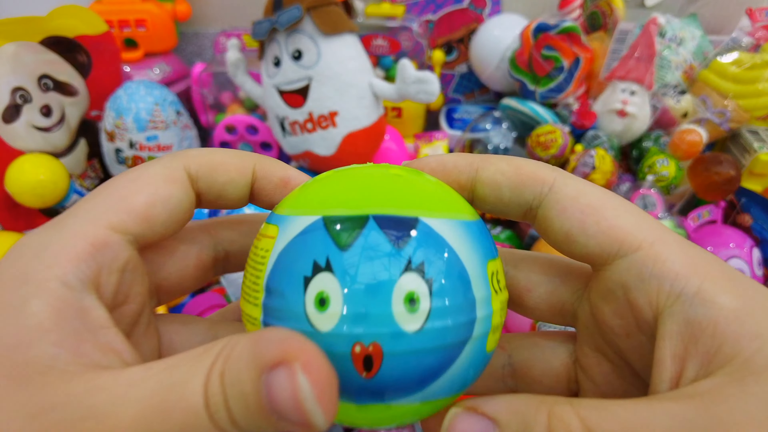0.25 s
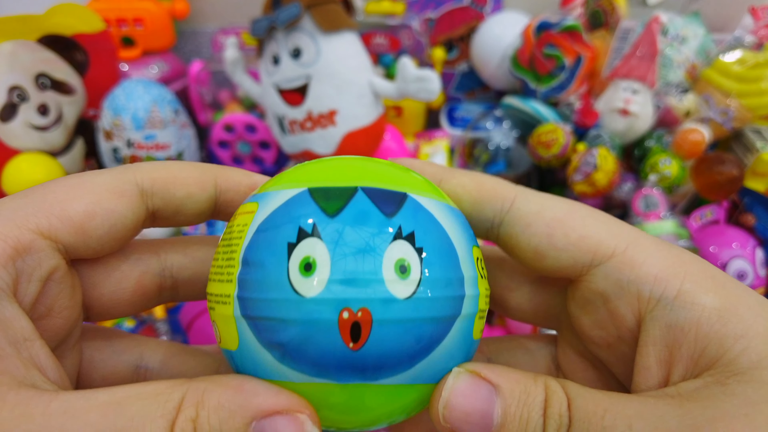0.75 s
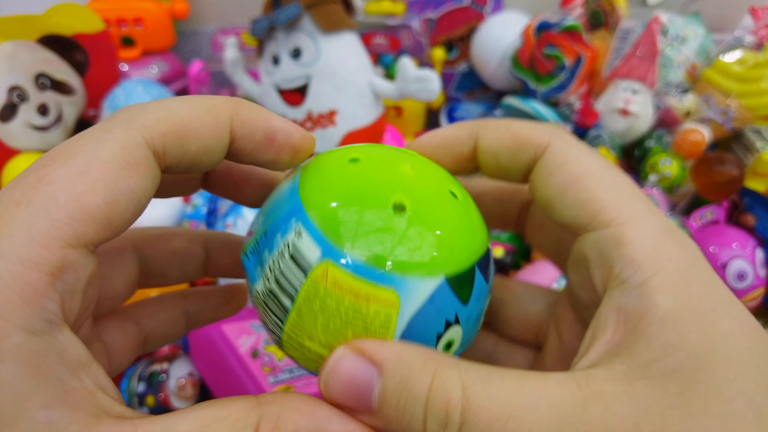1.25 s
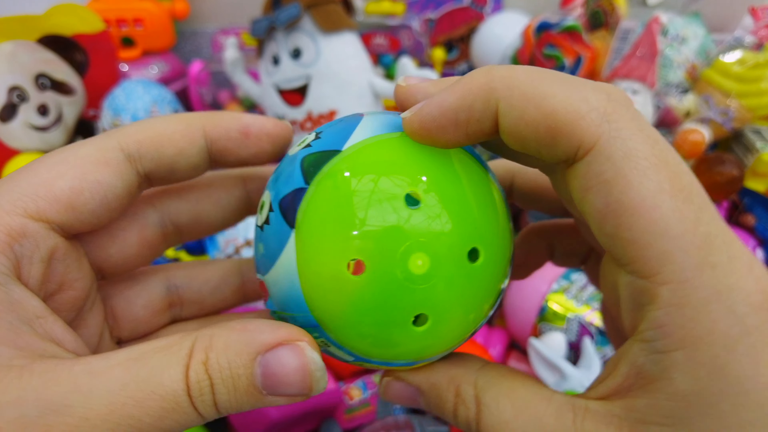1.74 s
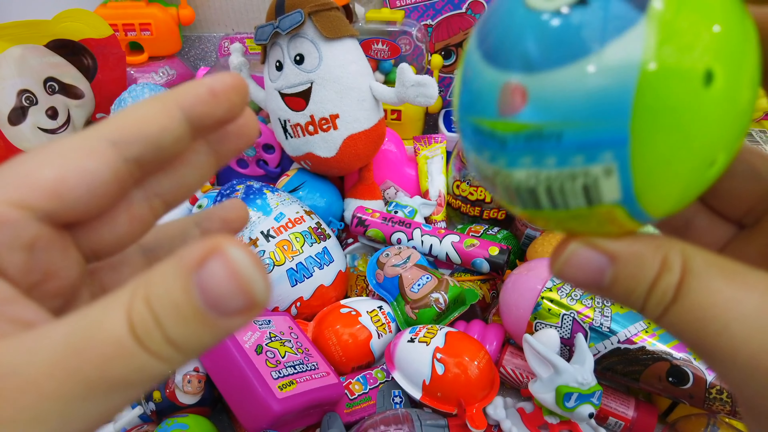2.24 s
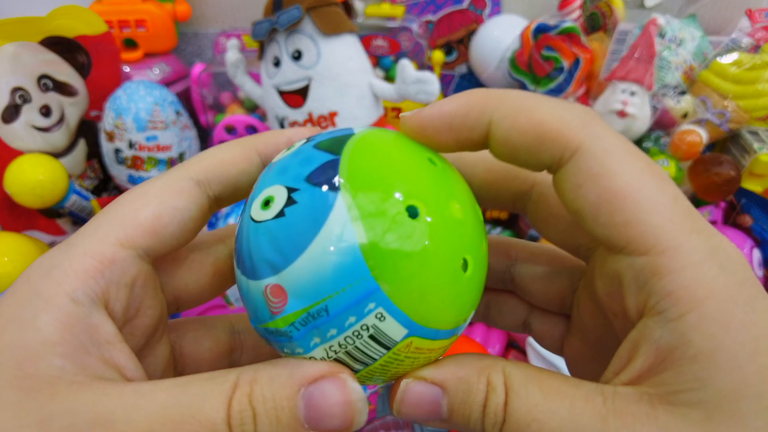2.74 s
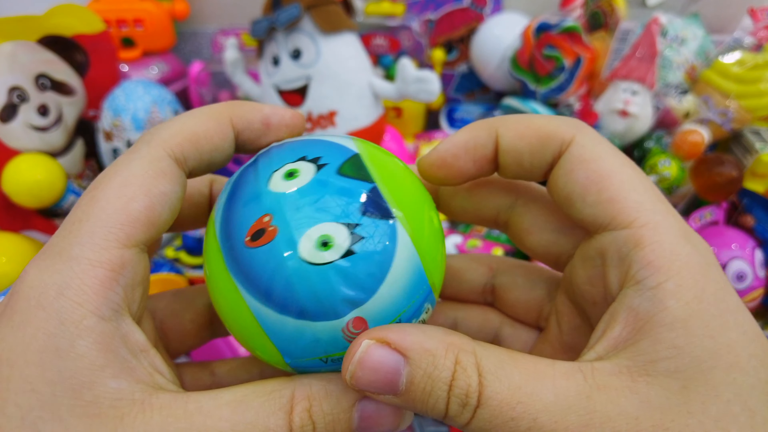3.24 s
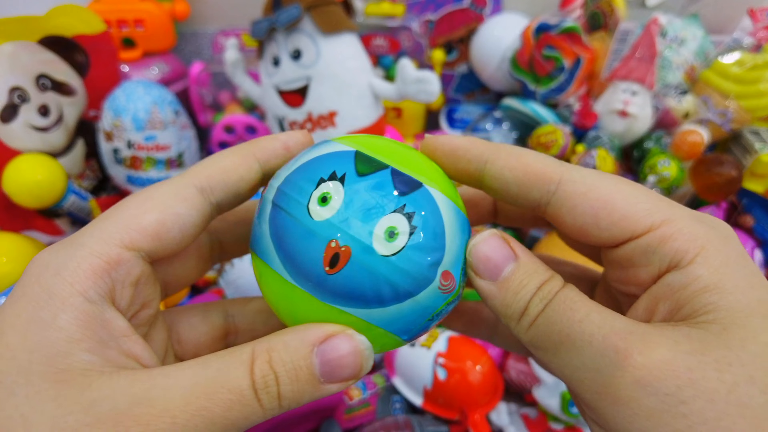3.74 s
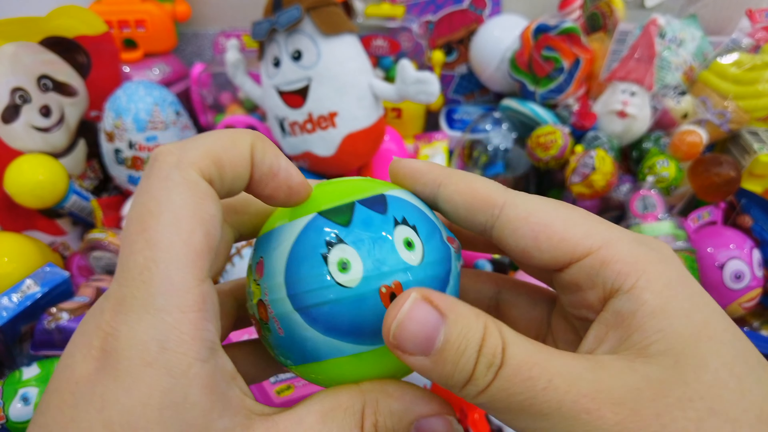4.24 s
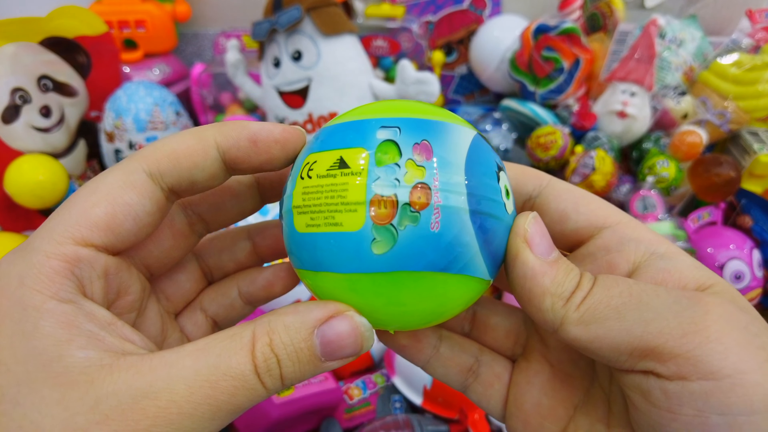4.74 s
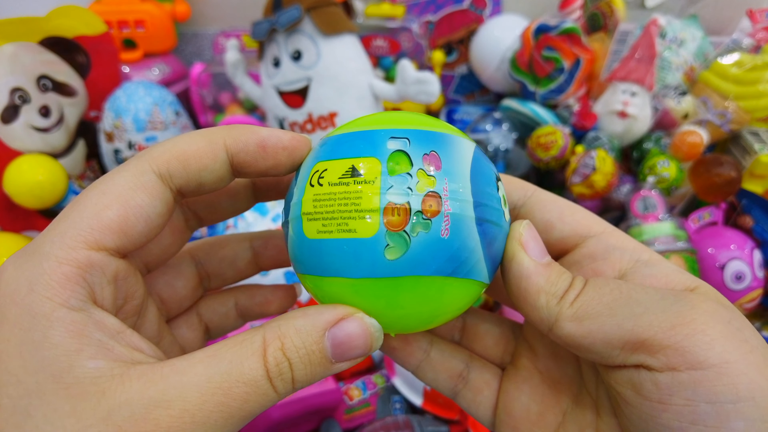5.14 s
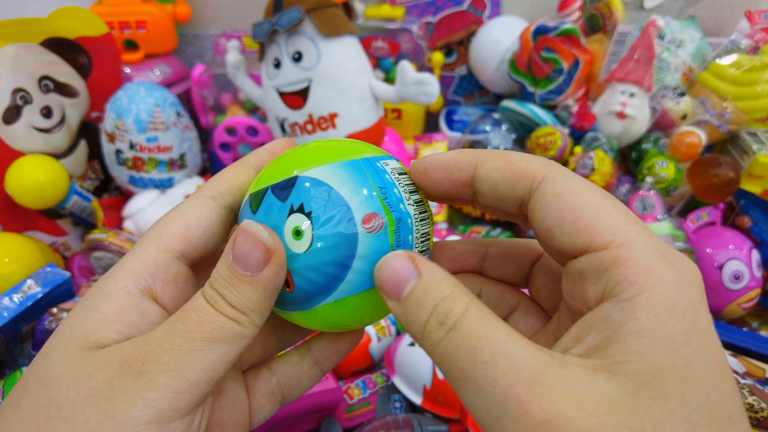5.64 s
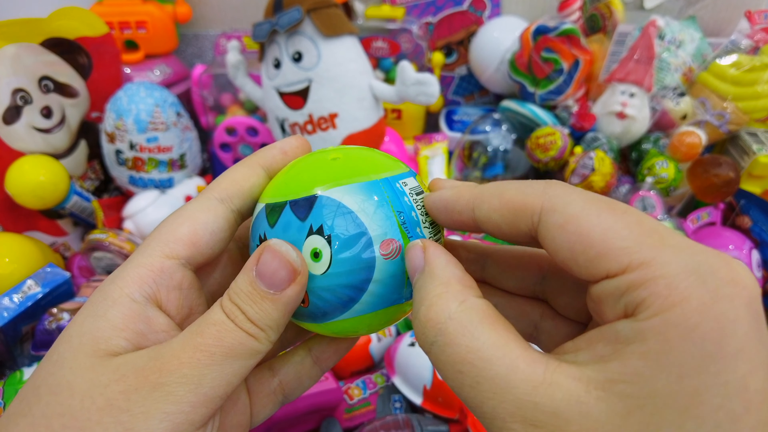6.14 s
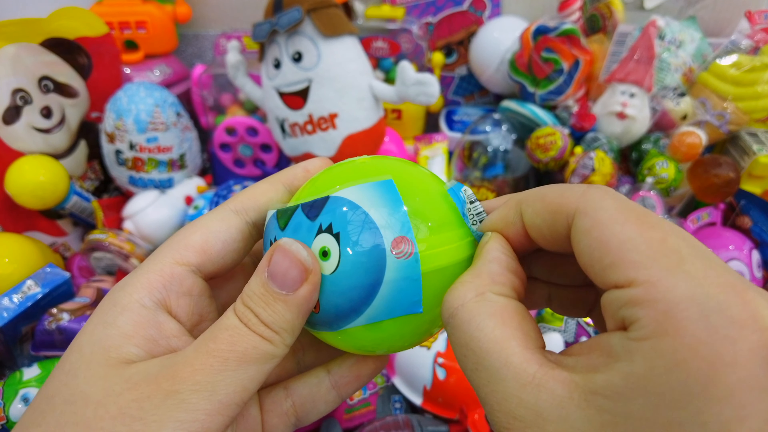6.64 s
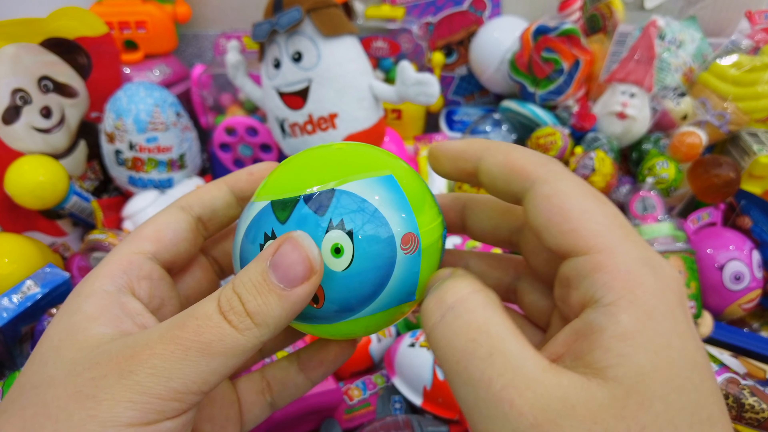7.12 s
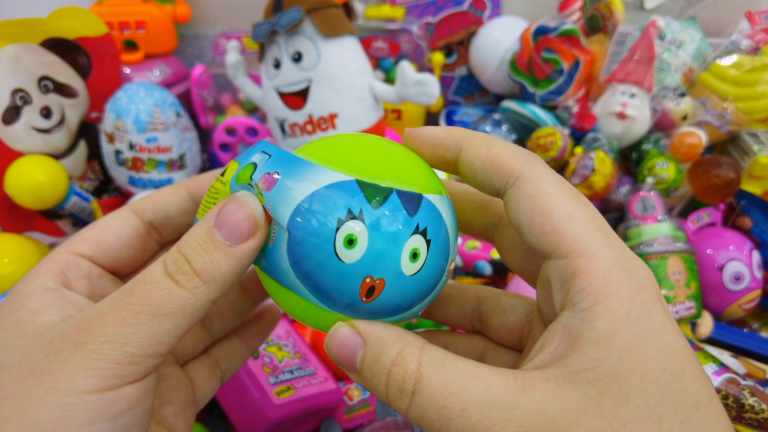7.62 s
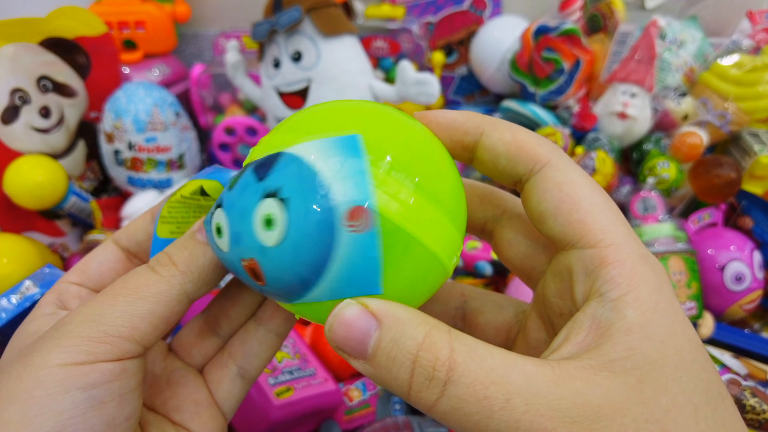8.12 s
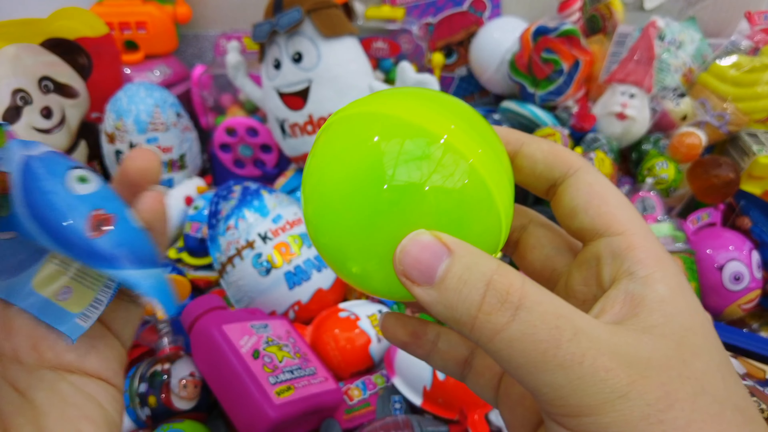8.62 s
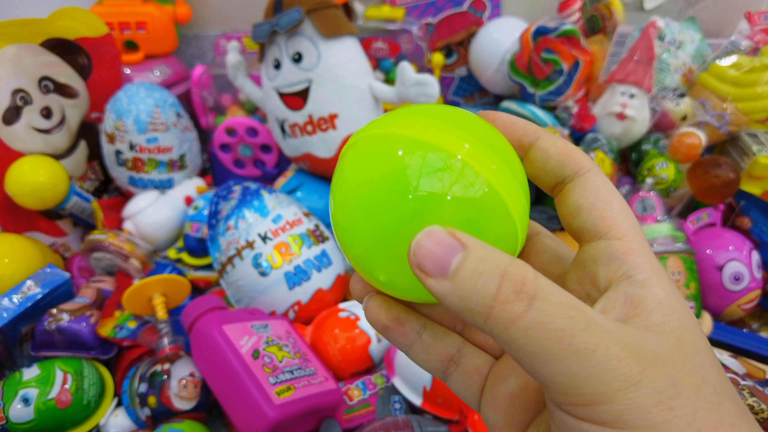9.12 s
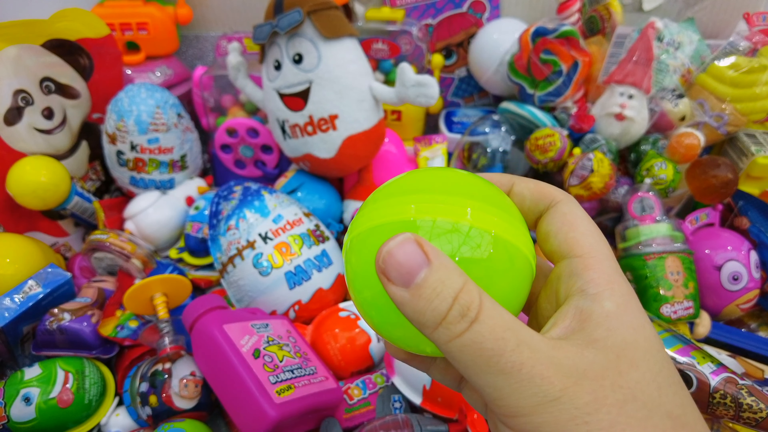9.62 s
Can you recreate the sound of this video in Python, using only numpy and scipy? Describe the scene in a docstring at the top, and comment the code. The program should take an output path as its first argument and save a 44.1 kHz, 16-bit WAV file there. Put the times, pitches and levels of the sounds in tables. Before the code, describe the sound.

Hands turn a hollow plastic ball with soft knocks, then give it a quick shake that rattles the toy inside. Skin hisses faintly over its shrink wrap, with small ticks and dull bumps. Then the stiff film is torn and peeled off in loud, sharp snaps over a fine crackle that carries on to the end. The microphone is very close, in a small quiet room.

```python
"""Soft knocks and a brief skitter: hands turn a hollow plastic ball close to a stereo microphone, then
shake it so that the toy inside rattles and rings the shell. Skin hisses over the stiff shrink film;
then the film is torn and peeled off, buckling in sharp snaps over a fine crackle of creases.
Underneath, the bumped table drones and a small quiet room rumbles. The loudest snaps overload,
and the sound cuts out three times for an instant."""
import sys
import numpy as np
from scipy import signal
from scipy.fft import rfft, irfft
from scipy.io import wavfile

SR = 44100
rng = np.random.default_rng(int(sys.argv[2]) if len(sys.argv) > 2 else 0)


def write(x):
    x = np.atleast_2d(x).T
    wavfile.write(sys.argv[1], SR, np.round(np.clip(x, -1, 1) * 32767).astype(np.int16))


N = 435266

# film buckling: t/s, level/dB, ring f/Hz, brightness (above 0 tips toward treble), nominal length/ms
FILM_SNAPS = [(2.5989, -29, 10300, 3.5, 2.3), (2.8472, -31, 10600, 7, 3.3), (3.15, -20.5, 9900, 61, 2.1),
              (3.2605, -26, 8500, 1, 1.3), (3.32, -15, 10900, 29, 1.3), (3.345, -21, 12000, 3, 1.9),
              (3.3555, -20.5, 11500, 22, 1.75), (3.4578, -26.5, 8900, 4, 2), (3.4952, -32, 5430, -15, 2.4),
              (4.0658, -27, 4450, 0, 9.7), (4.101, -28, 1490, -17, 1), (6.257, -27, 4830, 7, 2.4),
              (6.3672, -11, 4460, 18, 3), (6.3933, -2.5, 9000, 19, 2.26), (6.426, -16, 8550, 10, 4.5),
              (6.487, 8, 8850, 9, 2.03), (6.5359, 7, 4460, 6, 2.36), (6.62, -1, 2570, 47, 1.3),
              (6.6254, -6.5, 1680, 29, 2.3), (6.6354, 2, 2730, 3, 1.1), (6.788, -36, 8050, 22, 2.1),
              (6.927, -26, 9900, 3, 2.4), (7.024, -14.5, 2920, -12, 2.5), (7.0496, -2.5, 4170, 3, 2.6),
              (7.054, 1.5, 2960, 14, 1.77), (7.0606, 5.5, 6350, 21, 1.83), (7.1795, 7.5, 7800, 5, 2.7),
              (7.1815, -9.5, 2900, 7.5, 4.9), (7.214, -13.5, 6560, 21, 4.6), (7.345, -9, 2200, -23, 1),
              (7.3744, -7, 3660, -9, 1.7), (7.3866, -12.5, 4400, 19, 5.5), (7.435, -14, 4630, 22, 2.5),
              (7.4656, -18, 1720, -9, 2.9), (7.574, 6.5, 4640, 4, 1.16), (7.5873, -14, 2800, 17, 2.6),
              (7.7755, -6, 3440, -5, 2.15), (7.786, -14.5, 1420, -26, 4.2), (7.8179, -2, 2450, -33, 2.4),
              (7.8547, 1, 2440, -25, 2.68), (7.8695, -5.5, 1800, -44, 1.6), (7.923, -9, 1570, -2.5, 2.57),
              (8.037, -9, 3730, -20, 2), (8.084, -3, 2710, 0, 0.97), (8.134, -9.5, 3860, 36, 1.24),
              (8.1492, 2, 5670, 18, 1.5), (8.1768, -13, 1210, -8, 12), (8.2763, 0.5, 6250, -8, 2.5),
              (8.33, -9, 4700, 22, 2.4), (8.3395, -10.5, 3830, -18, 1.4), (8.38, -6, 8850, 10, 4.4),
              (8.3948, -1, 1270, 14, 2.94), (8.409, 15.5, 7860, 6, 0.99), (8.414, 18, 3620, -10, 1.23),
              (8.4474, 11.5, 5000, 9.5, 1.1), (8.4799, -6.5, 3350, -12, 3.7), (8.5065, -7, 5570, -12, 1.7),
              (8.5163, 9, 4980, 6.5, 2.12), (8.5904, -12, 2580, 5, 2.2), (8.6373, -8, 3420, -31, 3.2),
              (8.7549, 12.5, 3310, 8, 2), (8.7991, 18, 4650, 3.5, 1.8), (8.806, -16, 4900, -5, 3.4),
              (8.8346, -4.5, 1790, 22, 8.3), (8.8645, -4.5, 1830, 1, 5.6), (8.912, -14, 1700, -13, 3.3),
              (8.9476, -6, 2510, 20, 2.3), (8.9651, 6, 7300, 11, 1.54), (8.977, -11, 1680, -17, 3.4),
              (9.0046, 5.5, 3400, 9, 2.6), (9.012, -8, 7700, 15, 4.8), (9.072, -1, 1760, -43, 1),
              (9.0792, -4, 2610, 8, 2.1), (9.0909, -8.5, 1820, 40, 2), (9.1326, 1, 3140, 7, 2.1),
              (9.2, -5.5, 1950, 13, 3.3), (9.2734, -3, 9300, 35, 1.84), (9.4184, -5, 4830, -6, 1.5),
              (9.354, -9, 10500, 3.5, 2.25), (9.399, -8.5, 2390, 7, 3.6), (9.4573, 0, 2620, 0.5, 2.9),
              (9.493, -1, 2670, 3, 1.77), (9.501, -4, 5900, -8, 1.8), (9.517, 5.5, 9500, 4, 2.55),
              (9.5288, -12, 1410, -3, 4.6), (9.546, -4.5, 4440, -0.5, 11), (9.573, -7.5, 5700, 26, 8),
              (9.656, -9, 4000, 4, 4.1), (9.6879, -7.5, 4300, -1, 4.9), (9.727, -1, 9250, 10, 1.47),
              (9.8514, -0.5, 3300, 14, 3.16)]
# edges of the five tone bands of a snap: f/Hz
SNAP_BAND_EDGES = [450, 1250, 2200, 4400, 8800, 15000]
# tugs at the film, each a swell of crackle: t/s, level/dB, swell/s
FILM_TUGS = [(6.37, -31.5, 0.015), (6.49, -25, 0.021), (6.545, -25, 0.012), (6.63, -32, 0.28),
             (6.99, -40.5, 0.29), (7.056, -27.5, 0.026), (7.184, -23, 0.011), (7.387, -27.5, 0.047),
             (7.508, -34, 0.28), (7.575, -26, 0.015), (7.79, -28, 0.035), (7.85, -30, 0.036),
             (8.144, -19, 0.12), (8.386, -20, 0.14), (8.515, -26, 0.15), (8.63, -28.5, 0.25),
             (8.803, -18.5, 0.006), (8.862, -25.5, 0.25), (9.008, -23, 0.015), (8.955, -24.5, 0.039),
             (9.079, -24, 0.071), (9.2, -29, 0.045), (9.422, -33, 0.04), (9.575, -24.5, 0.26),
             (9.764, -33, 0.69), (9.86, -28, 0.013)]
# tone colour of the crackle: f/Hz, level/dB
FILM_SPECTRUM = [(290, -71), (500, -1), (1100, -10.5), (1600, 1), (7830, -11.5), (15100, -19.5)]
# hollow ring of the curled sheet as it bends: t/s, f/Hz
CURL_PITCH = [(8.0, 1540), (8.85, 1720), (9.5, 2580), (9.7, 1470)]
# toy and fingers striking the shell: t/s, level/dB, hardness/dB
SHELL_KNOCKS = [(0.0096, -25, -36), (0.0479, -29, -13), (0.1101, -29.5, -0.5), (0.2777, -35.5, 2),
                (0.713, -39, -5), (1.238, -38.5, 6.5), (1.256, -29, -12), (1.261, -27.5, -7),
                (1.266, -38, -10), (1.359, -38.5, -4), (1.389, -34, -11), (1.4131, -24.5, -7),
                (1.872, -37.5, -5), (1.9411, -15.5, -10), (1.953, -8.5, 2.5), (1.965, -20, 9),
                (1.968, -12.5, -1), (2.023, -22, 6), (2.028, -13.5, -13), (2.0344, -6, -0.5),
                (2.066, -25.5, 8), (2.111, -18, 6.5), (2.124, -12, 5), (2.1648, -16, -1.5),
                (2.1875, -21, -13), (2.194, -20.5, 3), (2.222, -22, -20), (2.793, -50, 12),
                (3.3858, -35.5, 4), (4.235, -39.5, 6), (4.2488, -32, -29), (4.6751, -27, -8),
                (4.746, -29, -3), (5.4319, -31.5, 1.5), (5.483, -32.5, -4), (6.818, -38, -23),
                (7.691, -24.5, -25)]
# modes of the loosely held ball: f/Hz, level/dB, t60/s
SHELL_MODES = [(452, 6, .048), (660, -3, .02), (947, -5, .025), (1270, -2, .025), (1550, -3, .02),
               (2880, -3, .03), (3100, 1.5, .035), (3420, -6, .025)]
# jolts that set the toy skittering: t/s, level/dB, swell/s
TOY_JOLTS = [(0.0, -30.5, .01), (.12, -44, 0.037), (1.261, -38, 0.007), (1.37, -43.5, 0.028),
             (1.418, -41.5, 0.1), (1.96, -17.5, 0.019), (2.042, -18.5, 0.029), (2.117, -12, 0.014),
             (2.195, -23.5, 0.055)]
# skin sliding over the film: t/s, level/dB, swell/s
SKIN_STROKES = [(0.0, -50, .01), (.35, -57, 0.87), (1.7, -51, 0.034), (2.612, -47, 0.025),
                (2.863, -49, 0.048), (3.152, -44, 0.009), (3.3, -34.5, 0.033), (3.509, -47, 0.027),
                (3.9, -44.5, 0.059), (3.962, -43, 0.1), (4.068, -41.5, 0.007), (4.383, -51.5, 0.22),
                (4.556, -47.5, 0.14), (5.428, -56, 0.39), (6.254, -55, .12)]
# fingers scuffing the gripped shell: t/s, level/dB, swell/s
FINGER_SCUFFS = [(4.1, -43, 0.043), (4.26, -45, 0.051), (4.69, -49, 0.087), (4.77, -42, 0.049),
                 (5.43, -46.5, 0.14)]
# how early snaps and knocks reach the left side: t/s, lead/s
LEFT_LEAD = [(0, -.00004), (7.5, 0), (9, .0001)]
# drone of the table under the microphone, one envelope per shove: t/s, level/dB
SHOVE_ENVELOPES = [
    [(.15, -39), (.184, -31), (.45, -38.5), (.95, -46.5)],
    [(5.44, -50), (5.49, -33.5), (5.62, -51)],
    [(6.1, -80), (6.14, -38), (6.3, -42)],
]
# resonances of the table: f/Hz, width/Hz
TABLE_MODES = [(135, 32), (200, 32), (320, 20.5)]
# mix of those resonances, one row per shove: low level/dB, middle level/dB, high level/dB
SHOVE_MODE_MIX = [(-1, -6.5, -13), (-10, -3, -0.5), (-2.5, -0.5, -4.5)]
# hands thumping and tapping ball and table: t/s, level/dB, f/Hz
HAND_THUMPS = [(0.177, -29, 135), (0.213, -20, 150), (1.236, -24.5, 51.3), (4.24, -27, 98),
               (5.4374, -14.5, 1200), (5.953, -28, 113), (7.861, -17, 249), (8.381, -24, 270),
               (8.971, -27, 255), (9.463, -15.5, 520), (9.745, -29.5, 210)]
# decay of the room's echoes: f/Hz, t60/s
ROOM_DECAY = [(400, 0.34), (1500, 0.14), (5000, 0.088), (14000, 0.11)]
# colour of the room tone: f/Hz, level/dB
ROOM_TONE_SPECTRUM = [(11, -38), (18, -0.5), (81, -11), (108, -16.5), (186, -10), (247, -46), (319, -3.5),
                      (412, -29), (9440, -46), (16200, -63)]
# stereo image of the room tone: f/Hz, left-right correlation
ROOM_TONE_LIKENESS = [(60, 0.92), (240, 0.84), (950, -0.25), (3770, 0.11), (15000, -0.24)]
# hum of far machinery: f/Hz, level/dB
MACHINE_HUM = [(38, -46.5), (77, -51.5)]
# dropouts: start t/s, end t/s
DROPOUTS = [(6.343, 6.3485), (6.352, 6.356), (7.5485, 7.566)]

PRE = 256   # samples of swell before a hit's peak
FILM_FREE_S, FREE_BASS_DB = 8.7, -4   # once off the ball the film loses its body


def snaps(length=1024):
    """Each buckle is a broad burst of a few milliseconds that rings the loose patch of film."""
    out = np.zeros((2, N))
    rows = FILM_SNAPS + judder()
    noise, chance = rng.standard_normal((len(rows), length)), rng.standard_normal((len(rows), 2))
    for (s, db, hz, brightness, ms), white, (pan, scatter) in zip(rows, noise, chance):
        run_s = max(ms - 1.1, .3) / 1000
        push = burst(white, rise_s=0.66 * run_s, fall_s=0.71 * run_s)
        # the small film radiates little bass
        tone_db = brightness * np.array([-0.67, -0.71, -0.49, 0.2, 0.84]) + [2.0, 9.4, 14.77, 14.7, 3.05]
        tone_db[0] += FREE_BASS_DB * (s > FILM_FREE_S)
        crack = sum(gain * rms_one(band(push, low, high))
                    for gain, low, high in zip(from_db(tone_db), SNAP_BAND_EDGES, SNAP_BAND_EDGES[1:]))
        ring = from_db(-1) * rms_one(resonance(push, hz, .15 * hz))
        snap = rms_one(rms_one(crack) + ring) * np.sqrt(run_s / 0.00087)   # same height at any length
        place(out, s, from_db(db - 18.5) * snap, pan_db=8.7 * pan, scatter_s=.00004 * scatter)
    return out


def judder(start_s=3.2795, gap_s=0.0045, gap_ratio=0.98, count=7):
    """A fingertip judders over the film: snap rows for a run of bright slips at a nearly steady pace."""
    db, hz, brightness, ms = -22, 10400, 16, 1.4
    timing, force = rng.standard_normal((count, 2)).T
    gaps = gap_s * gap_ratio ** np.arange(count) * np.exp(0.11 * timing)
    times = start_s + np.cumsum(gaps) - gaps[0]
    return [(s, db + 2 * z, hz, brightness, ms) for s, z in zip(times, force)]


def crackle(crease_decay_s=.0012, crisp_above_db=-28):
    """Tugged film creases in clusters, each crease a short flare of noise, with a rasp in between."""
    clicks = np.abs(grains(per_s=200, uneven_db=4, clump_db=5))
    flares = signal.lfilter([1], [1, -np.exp(-1 / (crease_decay_s * SR))], clicks)
    pull = swells(FILM_TUGS, fade_s=0.13)
    crisp = pull / (pull + from_db(crisp_above_db))   # a weak pull only rasps
    creases = (crisp * rms_one(flares) + 0.38) * rng.standard_normal((2, 2, N))
    film = noise_bands(creases, FILM_SPECTRUM, [(1500, 0.41), (16000, 0)], flicker_db=-1, low_hz=376.6)
    # thin film sends out little bass
    thin = signal.sosfilt(signal.butter(6, 1250, "high", fs=SR, output="sos"), film)
    thin = thin + from_db(-7) * curl_ring(thin) + crisp * facet_pops()
    free = np.arange(N) > FILM_FREE_S * SR
    body = 0.36 * from_db(FREE_BASS_DB * free)
    hollow = from_db(-8) * rms_one(band(creases[0, 0], 85, 290)) * ~free   # the ball thuds when pulled
    return pull * from_db(1) * (thin + body * (film - thin + hollow))


def curl_ring(x, width_hz=113, block=256):
    """The curled sheet's hollow resonance, its pitch following the bend."""
    hz = curve(CURL_PITCH)
    out, state = np.zeros_like(x), np.zeros((2, 2))
    for i in range(0, N, block):
        out[:, i:i + block], state = signal.lfilter(*resonator(hz[i], width_hz), x[:, i:i + block],
                                                    zi=state)
    return out


def facet_pops(count=18, t60_cycles=14, spread_s=0.00013):
    """Small facets of film flip and ring, each at its own pitch and its own spot in the stereo image."""
    clicks = grains(per_s=650, uneven_db=3.5, clump_db=5)[0]
    facet = rng.integers(0, count, N)
    out = np.zeros((2, N))
    for k, (hz, lead) in enumerate(zip(np.geomspace(1400, 13000, count), rng.standard_normal(count))):
        width_hz = np.log(1000) / np.pi * hz / t60_cycles
        flips = clicks * (facet == k) + 1e-12
        ring = from_db(at_hz(FILM_SPECTRUM, hz)) * hz * resonance(flips, hz, width_hz)
        out += [ring, np.roll(ring, round(lead * spread_s * SR))]
    return rms_one(out)


def knocks(loose_from_s=1.0, loose_until_s=4.0, length=4096):
    """Each knock is a dull thud that rings the shell; hard ones add a bright tick."""
    out = np.zeros((2, N))
    noise = rng.standard_normal((len(SHELL_KNOCKS), length))
    chance = rng.standard_normal((len(SHELL_KNOCKS), len(SHELL_MODES) + 2))
    blow = 1. * (np.arange(length) == PRE)
    for (s, db, hard_db), white, luck in zip(SHELL_KNOCKS, noise, chance):
        push = burst(white, rise_s=0.001, fall_s=0.00044)
        thud = from_db(4.5) * rms_one(band(push, 68, 1060)) + rms_one(band(push, 616, 1410))
        tick = from_db(hard_db + 4.5) * rms_one(band(push, 2000, 8700))
        if loose_from_s < s < loose_until_s:
            ring = shell(blow, 2 * luck, hard_db)
        else:   # a firm grip shortens the ring and stills the high modes
            ring = shell(blow, 2 * luck, hard_db=-30, decay_scale=.45)
        knock = from_db(-3.5) * rms_one(ring) + thud + tick
        place(out, s, from_db(db - 22) * knock, pan_db=1.2 * luck[-1], scatter_s=0.00025 * luck[-2])
    return out


def shell(push, strike_db, hard_db, decay_scale=1):
    """The hollow ball's modes, each struck with its own strength; soft blows barely stir the high ones."""
    out = 0
    for k, ((hz, db, t60), extra_db) in enumerate(zip(SHELL_MODES, strike_db)):
        tilt_db = 0.44 * hard_db * max(np.log10(hz / 1500), 0)
        mode = resonance(push, hz, width_hz=np.log(1000) / np.pi / t60 / decay_scale)
        out = out + (-1) ** k * from_db(db + extra_db + tilt_db) * np.sqrt(t60) * mode
    return out


def skitter():
    """The toy's many small bounces ring the shell over a broad clatter."""
    bounces = grains(per_s=1200, uneven_db=0.6, clump_db=6.2)
    ring = rms_one(shell(bounces, np.zeros(len(SHELL_MODES)), hard_db=0))
    clatter = rms_one(band(bounces, 300, 8600))
    rattle = rms_one(stereo(from_db(5) * ring + clatter, width=0.39))
    return swells(TOY_JOLTS, fade_s=0.063) * from_db(-0.5) * rattle


def slides():
    """A bright hiss of skin on film, with small ticks where it sticks and slips."""
    friction = rng.standard_normal((2, N)) + grains(per_s=500, uneven_db=4.5, clump_db=2.5)[0]
    hiss = band(band(friction, 1530, 22500), 1500, 22000)
    sheen = from_db(-17) * resonance(friction, 6200, 4200)
    return swells(SKIN_STROKES, fade_s=0.11) * from_db(drift(33)) * rms_one(hiss + sheen)


def scuffs():
    """Fingers slip on the gripped shell in tiny steps: a gritty midrange scrape."""
    slips = stereo(grains(per_s=550, uneven_db=3.1, clump_db=4), width=0.47)
    return swells(FINGER_SCUFFS, fade_s=0.066) * rms_one(band(slips, 520, 1580))


def table_drone():
    """Each shove shakes the table's low resonances."""
    white, out = rng.standard_normal((2, N)), 0
    modes = [resonance(resonance(white, hz, width), hz, 2 * width) for hz, width in TABLE_MODES]
    for envelope, mix_db in zip(SHOVE_ENVELOPES, SHOVE_MODE_MIX):
        drone = sum(from_db(db) * mode for db, mode in zip(mix_db, modes))
        out = out + from_db(curve(envelope, left=-120, right=-120)) * rms_one(stereo(drone, width=0.16))
    return out


def thumps():
    """Hands bump ball and table: centred thumps that die in a few cycles."""
    out, t = np.zeros((2, N)), np.arange(8192) / SR
    for s, db, hz in HAND_THUMPS:
        cycles = hz * t
        thump = np.sin(2 * np.pi * cycles) * cycles * np.exp(-cycles / 0.63)
        add(out, s, from_db(db) * thump / np.max(np.abs(thump)) * [[1], [1]])
    return out


def echoes(x):
    """The small room's diffuse reflections: a noise tail that dies band by band."""
    t = np.arange(int(.6 * SR)) / SR
    white, edges = rng.standard_normal((2, len(t))), 125 * 2 ** np.arange(8.)
    tail = sum(band(white, low, high) * from_db(-60 * t / at_hz(ROOM_DECAY, np.sqrt(low * high)))
               for low, high in zip(edges, edges[1:]))
    tail *= 1 - np.exp(-t / 0.00029)   # soft onset
    tail /= np.sqrt(np.sum(tail ** 2) / 2)
    return signal.fftconvolve(x, tail, axes=1)[:, :N]


def room_tone():
    """The quiet room's restless rumble under a faint hiss."""
    white = rng.standard_normal((2, 2, N))
    return noise_bands(white, ROOM_TONE_SPECTRUM, ROOM_TONE_LIKENESS, flicker_db=4, low_hz=21.65)


def hum():
    """Far machinery wavers in the centre: noise through narrow low resonances."""
    white = rng.standard_normal(N)
    return sum(from_db(db) * rms_one(resonance(white, hz, width_hz=1.6)) for hz, db in MACHINE_HUM)


def from_db(db):
    """Gain of a level in dB."""
    return 10 ** (np.asarray(db) / 20)


def rms_one(x):
    """Scaled to rms 1."""
    return x / np.sqrt(np.mean(x ** 2) + 1e-20)


def curve(rows, **outside):
    """A breakpoint curve read at every sample."""
    return np.interp(np.arange(N) / SR, *np.transpose(rows), **outside)


def at_hz(points, hz):
    """A table read on a log frequency axis."""
    freqs, values = np.transpose(points)
    return np.interp(np.log(hz), np.log(freqs), values)


def band(x, low_hz, high_hz):
    """Gentle band-pass."""
    sos = signal.butter(2, [low_hz, min(high_hz, .45 * SR)], "band", fs=SR, output="sos")
    return signal.sosfilt(sos, x)


def resonator(hz, width_hz):
    """Two-pole filter coefficients, gain 1 at the peak."""
    r = np.exp(-np.pi * width_hz / SR)
    return np.array([1, 0, -1]) * (1 - r * r) / 2, [1, -2 * r * np.cos(2 * np.pi * hz / SR), r * r]


def resonance(x, hz, width_hz):
    """Rings x at one steady pitch."""
    return signal.lfilter(*resonator(hz, width_hz), x)


def drift(rate):
    """Random wander of spread near 1, with rate turns a second."""
    return np.interp(np.arange(N) / SR * rate % 399, np.arange(400), rng.standard_normal(400))


def grains(per_s, uneven_db, clump_db):
    """Two streams of random clicks, uneven in size, that clump together."""
    when, size, sign = rng.random((3, 2, N), dtype=np.float32)
    born = when < per_s * from_db(clump_db * drift(35)) / SR
    out = np.full(born.shape, 1e-9)
    out[born] = from_db(uneven_db * np.minimum(-np.log(1 - size[born]), 5)) * np.sign(sign[born] - .5)
    return out


def burst(noise, rise_s, fall_s):
    """Noise that swells to a peak and dies."""
    t = (np.arange(len(noise)) - PRE) / SR
    return noise * np.exp(np.where(t < 0, t / rise_s, -t / fall_s))


def swells(events, fade_s):
    """Envelope of events that rise 20 dB per swell time and fall 20 dB per fade time; powers add."""
    t, power = np.arange(0, N + 32, 32) / SR, 0
    for s, db, swell_s in events:
        slope = np.where(t < s, (t - s) / max(swell_s, .002), (s - t) / fade_s)
        power = power + from_db(db + 20 * slope) ** 2
    return np.interp(np.arange(N) / SR, t, np.sqrt(power))


def noise_bands(noise, spectrum, likeness, flicker_db, low_hz):
    """Half-octave bands of noise, each with its own level, flicker and left-right likeness."""
    mids, sides = 0, 0
    edges = low_hz * 2 ** np.arange(0, np.log2(25000 / low_hz), .5)
    for k, (low, high) in enumerate(zip(edges, edges[1:])):
        hz = np.sqrt(low * high)
        gain = from_db(at_hz(spectrum, hz) + flicker_db * drift(9.9))
        mid, side = gain * band(noise[k % 2], low, high)
        alike = at_hz(likeness, hz)
        mids, sides = mids + np.sqrt(1 + alike) * mid, sides + np.sqrt(1 - alike) * side
    return rms_one(stereo((mids, sides), width=1))


def stereo(mid_side, width):
    """Left and right from mid and side."""
    mid, side = mid_side
    return mid + width * side * [[1], [-1]]


def place(out, s, sound, pan_db, scatter_s):
    """Mixes in a mono hit, panned by level and by arrival time."""
    lead = (np.interp(s, *np.transpose(LEFT_LEAD)) + scatter_s) * SR
    spectrum = rfft(sound)
    w = 2 * np.pi * np.arange(len(spectrum)) / len(sound)
    pair = [from_db(side * pan_db / 2) * irfft(spectrum * np.exp(-1j * w * (16 - side * lead / 2)))
            for side in (1, -1)]
    add(out, s, np.array(pair))


def add(out, s, pair):
    """Mixes in a short stereo sound, starting just ahead of time s."""
    start = round(s * SR) - PRE - 16   # 16 samples of slack for the stereo delay
    pair = pair[:, max(-start, 0):N - start]
    start = max(start, 0)
    out[:, start:start + pair.shape[1]] += pair


def scene():
    """Film and ball up close, the hits with a little room, over a low bed that leans right."""
    hits = snaps() + knocks() + skitter()
    bed = (from_db(-43) * room_tone() + hum() + table_drone() + thumps()) * from_db([[-.7], [.7]])
    return hits + from_db(-10) * echoes(hits) + crackle() + slides() + scuffs() + bed


def record(dry, mic_rolloff_hz=14700, fade_in_s=0.0023, stopband_hz=16765):
    """The microphone softens the top, overload flattens peaks, brief moments drop out, the top is cut."""
    t = np.arange(N) / SR
    gate = np.prod([np.where(t < start, 1, np.clip((t - end) / fade_in_s, 0, 1))
                    for start, end in DROPOUTS], axis=0)
    softened = signal.sosfilt(signal.butter(2, mic_rolloff_hz, fs=SR, output="sos"), dry)
    overloaded = np.clip(softened, -1, 1)
    top_cut = signal.cheby2(12, 60, stopband_hz, fs=SR, output="sos")
    return np.clip(signal.sosfilt(top_cut, overloaded * gate), -1, 1)


dry = scene()
out = record(dry)
write(out)
```